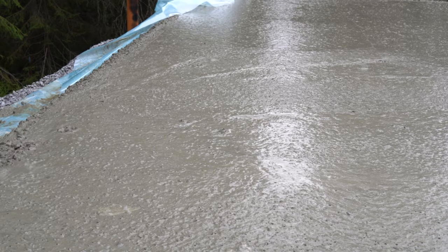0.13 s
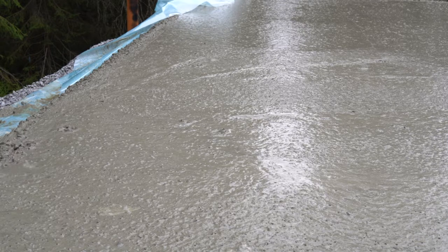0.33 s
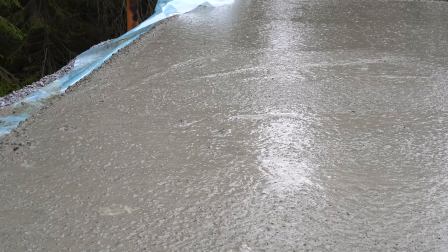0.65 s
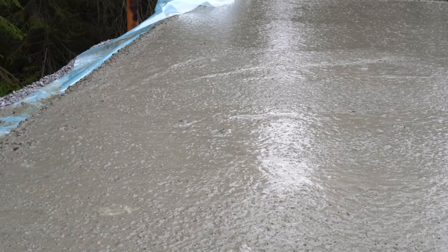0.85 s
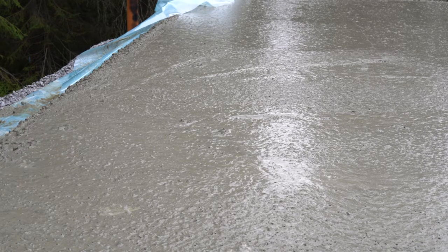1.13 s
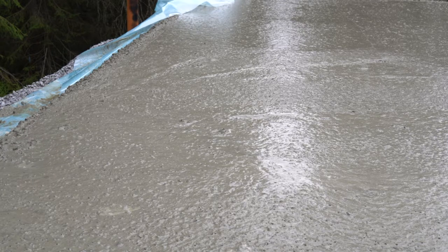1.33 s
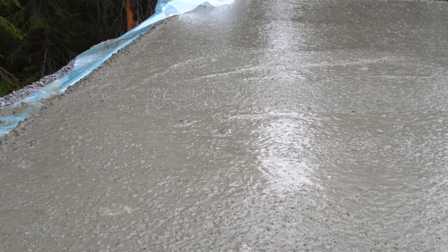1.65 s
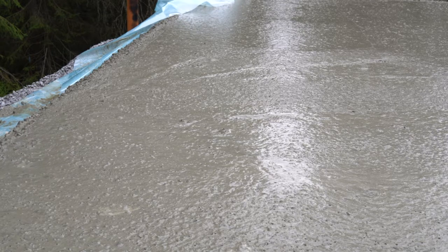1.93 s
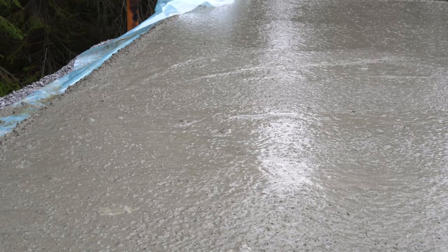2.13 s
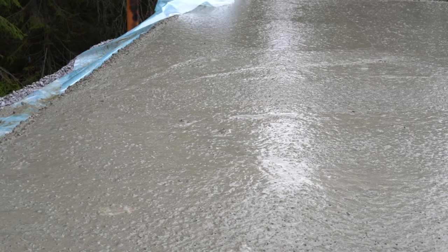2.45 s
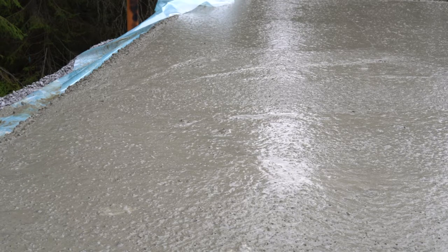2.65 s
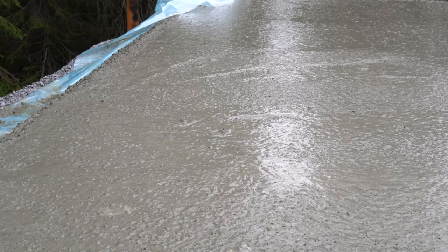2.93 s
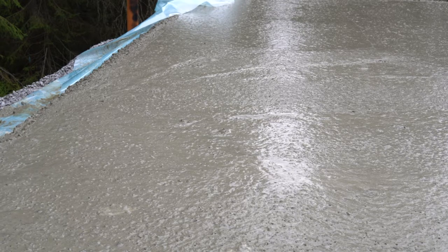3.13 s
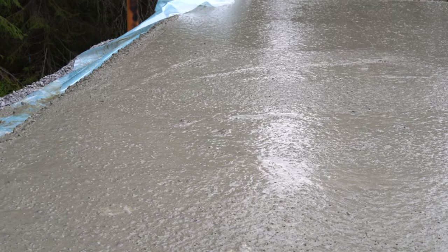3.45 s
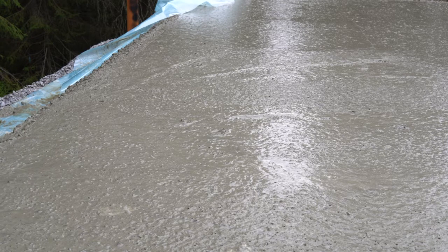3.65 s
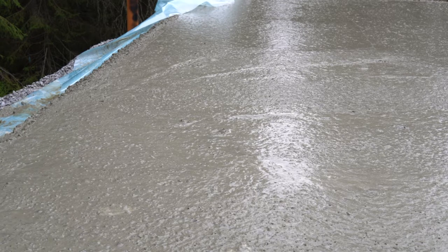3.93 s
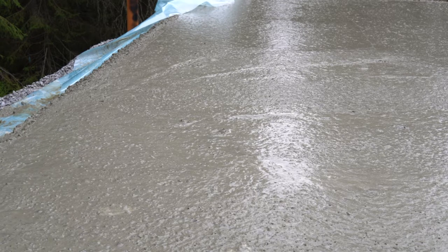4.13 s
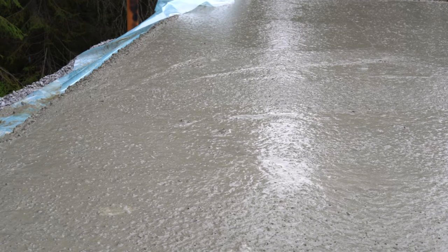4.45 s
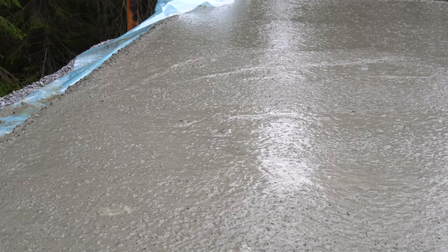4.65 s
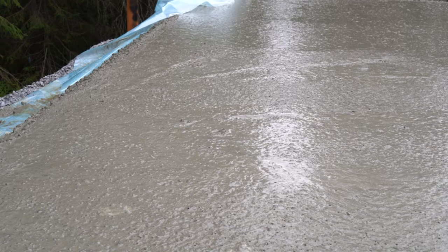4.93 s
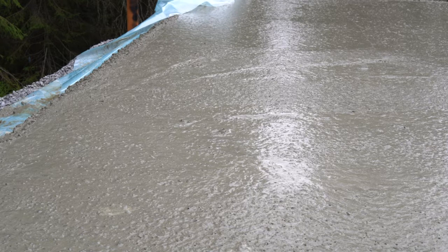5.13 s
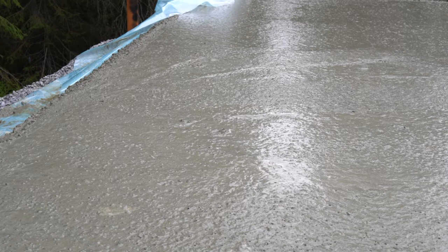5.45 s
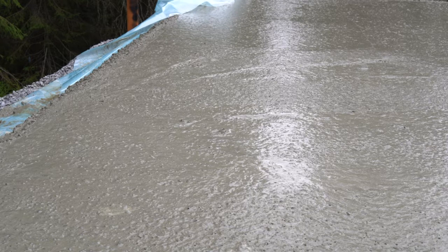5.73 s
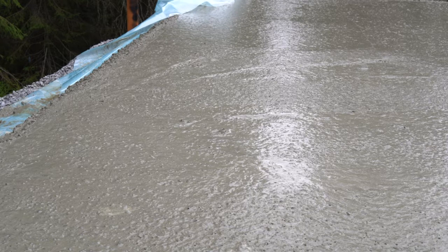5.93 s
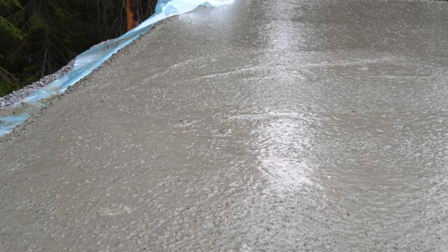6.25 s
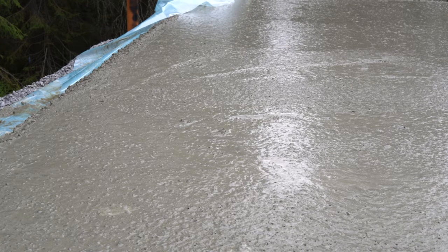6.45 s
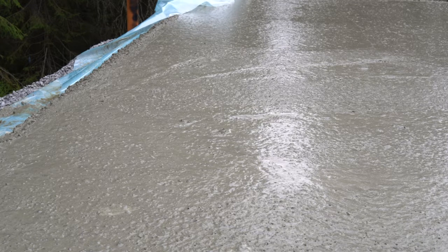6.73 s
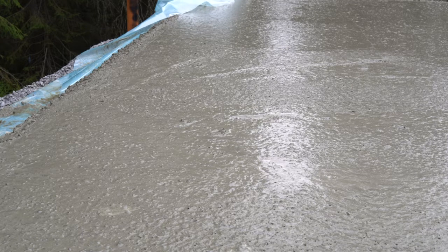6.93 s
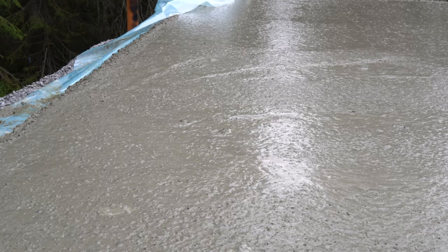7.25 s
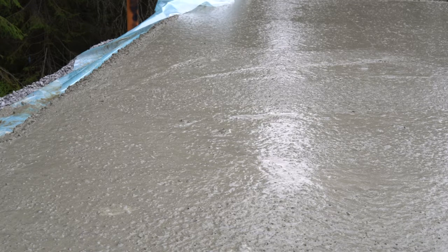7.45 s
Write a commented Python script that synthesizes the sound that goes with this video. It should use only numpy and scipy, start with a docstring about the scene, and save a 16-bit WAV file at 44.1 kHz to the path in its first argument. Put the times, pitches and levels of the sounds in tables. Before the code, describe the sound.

A concrete vibrator hums and whirs loudly in wet concrete, is switched off, winds down with scraping and ringing, then handling knocks and faint clicks.

```python
"""A poker vibrator hums in a slab of wet concrete: an eccentric weight forces the slab once a turn.
Its electric drive whirs close by on the left, as tones and noise bands tied to the shaft speed.
The shaft sags under load, is switched off and coasts down, brushes scraping and housing ringing.
The tool is shifted in the hand: rustles, one sharp clack and a few faint clicks, as shaped noise."""
import sys
import numpy as np
from scipy import signal
from scipy.fft import rfft, irfft
from scipy.io import wavfile

SR = 44100
rng = np.random.default_rng(int(sys.argv[2]) if len(sys.argv) > 2 else 0)


def bounce(signal):
    """Save signal as a 16-bit WAV file at the path given by the first command-line argument."""
    frames = np.transpose(np.atleast_2d(signal))
    limited = np.clip(frames, -1, 1)
    pcm = np.round(limited * 32767).astype(np.int16)
    wavfile.write(sys.argv[1], SR, pcm)


N = 334719
T = np.arange(N) / SR
HZ = np.fft.rfftfreq(N, 1 / SR)

OFF_S = 3.52  # the motor is switched off
# coasting: the fan's drag soon takes its part of the speed, friction takes the rest evenly
DRAG_HZ, DRAG_S, FRICTION_HZ_PER_S = 102.9, 0.47, 45
# shaft speed when fully loaded by the concrete, and when running almost free
LOADED_HZ, FREE_HZ = 265.6, 280.3
# the scrape's centre sinks with the shaft: pitch at rest, and Hz per Hz of shaft speed
SCRAPE_REST_HZ, SCRAPE_ORDER = 3020, 7.84
RING_STOP_HZ = 70  # below this shaft speed the housing's ring dies out steeply
RASP_DB = -67  # steady part of the bearing's rasp until the switch-off
EDGE_HZ = 15900  # upper edge of the whole sound

# shaft speed: it sags as the head sinks in, and picks up as the load eases: start_s, speed_hz
SPEED = [(.21, 312.3), (.6, 276.7), (.8, 268), (1.05, 267.1), (1.5, 259.6), (2.03, 270.6), (2.42, 267.6),
         (3, 271.7), (3.52, 283)]
# how well the head shakes the slab under power: start_s, first_order_db, second_order_db, third_order_db
SHAKE = [(.07, -37.5, -52, -64), (.125, -47, -54, -46), (.18, -32.5, -36, -43.5), (.41, -22, -33, -38.5),
         (.76, -24.5, -48.5, -44.5), (.92, -24.5, -38.5, -37.5), (1.32, -27.5, -43.5, -47.5),
         (1.45, -24, -57, -46.5), (1.66, -25.5, -39, -41), (1.98, -26, -42, -49.5), (2.16, -22, -42, -58),
         (2.23, -25, -46, -50), (2.35, -20, -37.5, -63), (2.45, -21.5, -47, -51), (2.56, -19, -41, -43),
         (2.76, -22, -45, -43), (3, -21.5, -35, -34), (3.15, -23, -41, -44.5), (3.28, -22.5, -44, -38.5),
         (3.52, -24.5, -41, -46)]
# weakening of the head's first three orders as it slows: fall_db_per_octave for each
POKER_FALL_DB = [26.5, 23.5, 25]
# weaker orders of the head, against the third: shaft_multiple, level_db
OVERTONES = [(4, -14.5), (5, -12.5), (6, -18.5)]
# narrow band that the slab hardly radiates: centre_hz, half_width_hz (to 1/e of the depth), depth_db
DEAD_BAND = (173, 18.5, 8.7)
# mains hum: pitch_hz, level_db
HUM = [(101, -66.5), (202, -52)]

# noise spectra of gravel, fan rush and brush fizz (only the shape counts): pitch_hz, density_db_per_hz
CHURN = [(25, -33.5), (60, -29.5), (100, -12.5), (150, -14), (230, 3), (400, -0.5), (650, -3.5),
         (1000, -8.5), (2000, -5.5), (5000, -42)]
AIR = [(150, -34.5), (400, -6), (950, -11.5), (1400, -16.5), (2100, -7.5), (3300, -5.5), (4300, -11),
       (6300, -13), (9000, -20), (11000, -27)]
FIZZ = [(2500, -29.5), (5000, 2.5), (6500, 2.5), (9200, 2.5), (10500, -2), (12500, -4.5), (14300, -1.5),
        (16000, -10.5)]
# resonances of the motor casing in the fan's rush: pitch_hz, half_width_hz, relative_db
CASING = [(1237, 27, 0.5), (1656, 220, 1), (2435, 190, 0), (2918, 81, -3), (4830, 320, -24),
          (5950, 250, -14.5)]
# layers that follow the shaft: loaded_level_db, free_running_gain_db, fall_db_per_octave of slowing
CHURN_LEVEL = (-44.5, 1, 19.8)
AIR_LEVEL = (-44, 3.3, 13.6)
FIZZ_LEVEL = (-57.5, 8.1, 9)
BUZZ_LEVEL = (-56.5, 8.9, 16)

# buzz of the armature and whine of the commutator: shaft_multiple, relative_db
BUZZ = [(7, -1.5), (9, -6.5), (10, -1), (11, 2), (12, -3), (14, -0.5), (15, -5.5), (16, -13), (17, -2),
        (18, -3.5)]
WHINE = [(25, -25), (26, -3), (27, 1.5), (28, 2.5), (29, -15.5), (30, -4.5), (31, -7), (32, -18.5),
         (33, -10)]
# the commutator sings out in spells: full_from_s, fall_from_s, level_db, rise_db_per_s, fall_db_per_s
SINGING = [(0.05, 0.449, -51, 10, 9), (2.76, 3.5, -51.5, 60, 22)]
# the brushes' hissing bands under power: shaft_multiple, width_hz, level_db
BRUSH = [(28.66, 420, -62), (34.65, 330, -66.5)]
# the bearing's rasp builds: full_from_s, fall_from_s, level_db, rise_db_per_s, fall_db_per_s
RASP_SWELL = (3.5, 3.5, -51, 21.5, 32)

# partials as the loose weight whirls in coasting: shaft_multiple, level_db
WHIRL = [(1.5, -58.5), (2.3, -59.5), (2.62, -66)]
# ragged strands of the unpowered commutator: shaft_multiple, width_hz, relative_db
STRANDS = [(23.56, 100, -3.5), (25, 100, 2), (27.2, 39, 1.5), (30.06, 350, 2.5), (33.18, 560, -6.5),
           (36.2, 390, -10)]
# modes of the housing, and of the bearing before its low cut: pitch_hz, half_width_hz, relative_db
HOUSING = [(5400, 350, 9.5), (7600, 290, 2), (9040, 45, -18.5), (8940, 69, 5), (9550, 140, 4),
           (10250, 58, 5), (11420, 160, 5), (12800, 170, -2.5), (13950, 140, 3.5), (15400, 170, -12)]
BEARING = [(463, 81, 0.5), (1317, 120, 2), (1970, 200, -6), (2380, 150, -3.5), (3020, 190, -2)]
# spectra of the coasting brushes' fine sizzle and of the low rumble: pitch_hz, density_db_per_hz
SIZZLE = [(4000, -21), (6800, -13), (9300, 2.5), (11000, -4), (14300, -2.5), (16000, -6.5)]
RUMBLE = [(20, -19), (45, -9.5), (80, 5.5), (130, -10), (300, -29.5), (800, -60.5)]
# swells of the coasting sounds; where the fall starts before the rise ends, both slopes act at once:
# full_from_s, fall_from_s, level_db, rise_db_per_s, fall_db_per_s
STRANDS_SWELL = (4, 4.5, -46, 26.5, 61)
RING_SWELL = (6.5, 5.5, -56, 0.5, 27.5)
RUMBLE_SWELL = (4, 4.5, -72.5, 35, 60)
SIZZLE_SWELL = (5, 5.5, -58.5, 21, 70)
# the brushes bite in waves, and the bearing rubs: same columns
SCRAPES = [(4.2, 4.506, -43.5, 27, 23), (5.149, 5.185, -45, 35, 34), (6.1, 6.144, -58, 19, 59.5)]
RUBS = [(4.86, 5.198, -57, 20.5, 26), (6.12, 6.16, -60.5, 49, 19.5)]

# shifts of the tool in the hand, and the low bump of the first: same columns
RUSTLES = [(5.105, 5.125, -52, 250, 170), (5.258, 5.31, -54, 34.5, 44), (5.96, 6, -56.5, 198, 198),
           (6.64, 6.642, -58.5, 163, 190), (6.802, 6.85, -67, 33, 170), (7.345, 7.383, -55, 250, 160),
           (7.495, 7.537, -61.5, 121.5, 240)]
BUMP = (5.125, 5, -63, 325, 200)
# spectra of the rustles, the knocks and the steady background: pitch_hz, density_db_per_hz
RUSTLE = [(35, -51.5), (100, -23.5), (217, -13.5), (390, -3), (666, -7), (1010, -13), (1410, -16),
          (2580, -14.5), (3760, -21.5), (9350, -26), (13000, -24.5), (16000, -39)]
KNOCK = [(35, -52.5), (60, -13), (287, -9), (448, 4), (785, -9.5), (1250, 1), (1860, -1.5), (2050, -5.5),
         (3190, -8.5), (4420, -15.5), (5720, -16), (6740, -25.5), (8320, -20), (11800, -23), (16000, -38)]
FLOOR = [(25, -5.5), (100, -9), (400, -8.5), (1400, -3), (2500, -8.5), (4000, -19.5), (16000, -16.5)]
# knocks and clicks of the tool: start_s, level_db, decay_t60_s, brightness_db_per_octave
KNOCKS = [(5.092, -35, 0.0081, 6), (5.108, -38, .03, 1), (5.384, -40.5, 0.025, -4.5),
          (5.759, -49, 0.035, -7), (5.995, -57, 0.034, -3), (6.555, -51.5, 0.091, 7),
          (6.578, -42.5, 0.047, 8), (6.590, -29, 0.073, 2), (6.5954, -28, 0.045, 2.5),
          (6.657, -48, .015, 6.5), (6.798, -53, 0.011, 2), (7.193, -67.5, .03, 2), (7.265, -64, 0.056, 3),
          (7.369, -42.5, 0.021, 5), (7.477, -49, 0.017, -2), (7.538, -51.5, 0.026, 3)]
# stereo image of the drive and of the slab: pitch_hz, left_minus_right_db, channel_likeness (0 to 1)
NEAR = [(97.3, -4.5, 0.88), (500, 7, 1), (1375, 22, 1), (2800, 12.5, 0.51), (5500, 12, 0.33),
        (9920, 10, 0.39), (14530, 7, 0.55)]
SLAB = [(100, 0.32, 1), (270, 1.46, 1), (700, 3.5, 0.97), (2000, 6, 1)]


def amp(db):
    """Level law: decibels to an amplitude ratio."""
    return 10 ** (np.asarray(db) / 20)


def unit(x):
    """Normalisation to an rms of 1."""
    return x / np.sqrt(np.mean(x ** 2) + 1e-20)


def curves(rows):
    """Linear interpolation of a table's columns over time."""
    s, *columns = np.transpose(rows)
    return [np.interp(T, s, column) for column in columns]


def spectra(rows):
    """Linear interpolation of a table's columns over log frequency."""
    hz, *columns = np.transpose(rows)
    return [np.interp(np.log(HZ + 1), np.log(hz), column) for column in columns]


def colour(rows):
    """Spectral shaping: gain over frequency of a short spectrum."""
    return amp(spectra(rows)[0])


def modes(rows):
    """Superposition of resonances, each with its gain halved at the half-width."""
    return sum(amp(db) / (1 + ((HZ - hz) / half_width) ** 2) for hz, half_width, db in rows)


def drift(rate_hz):
    """Slow random modulation: noise low-passed at 0.8 of rate_hz, with an rms of 1."""
    s = np.arange(0, T[-1] + 1, 1 / (8 * rate_hz))
    lowpass = signal.butter(2, 1 / 5, output="sos")
    wander = signal.sosfilt(lowpass, rng.standard_normal(len(s)))
    return unit(np.interp(T + 1 / 2, s, wander))  # skips the filter's first half second


def fade(s, db_per_s):
    """Exponential decay that sets in at s."""
    return amp(-db_per_s * np.maximum(T - s, 0))


def swell(start_s, end_s, db, rise_db_per_s, fall_db_per_s):
    """Exponential growth until start_s and exponential decay from end_s."""
    return amp(db - rise_db_per_s * np.maximum(start_s - T, 0)) * fade(end_s, fall_db_per_s)


def swells(rows):
    """Power addition of several swells."""
    return np.linalg.norm([swell(*row) for row in rows], axis=0)


def hiss():
    """Two statistically independent white noises."""
    return rng.standard_normal((2, N))


def filtered(x, gain):
    """Minimum-phase filtering by the folded cepstrum; white noise keeps its power."""
    gain = np.maximum(unit(gain), 1e-5)
    size = 8192
    log_gain = np.log(np.interp(np.fft.rfftfreq(size, 1 / SR), HZ, gain))
    cepstrum = irfft(log_gain)
    cepstrum[1:] *= 2 * (np.arange(1, size) < size / 2)
    impulse = irfft(np.exp(rfft(cepstrum)))[None, :size // 2]
    return signal.oaconvolve(x, impulse, axes=1)[:, :x.shape[1]]


def resonate(x, hz, width_hz):
    """Heterodyne resonance: a double pole in the frame turning at the curve hz."""
    turn = np.exp(2j * np.pi * np.cumsum(hz) / SR)
    r = np.exp(-np.pi * width_hz / SR)
    return (turn * signal.lfilter([(1 - r) ** 2], [1, -2 * r, r * r], x / turn)).real


def place(pair, side, lag_s):
    """Stereo by level, coherence and delay: the balance varies with frequency and the right lags."""
    balance_db, same = spectra(side)
    same, ratio = np.clip(same, 0, 1), amp(-balance_db)
    a, b = rfft(pair)
    mixed = same * a + np.sqrt(1 - same ** 2) * b
    right = ratio * mixed * np.exp(-2j * np.pi * HZ * lag_s)
    return irfft(np.array([a, right]) * 2 / (1 + ratio), N)


def shaft():
    """Rotational run-down: the load sets the speed in Hz, then drag and friction lower it to 10 Hz."""
    coast_s = np.maximum(T - OFF_S, 0)
    dragged_hz = DRAG_HZ * (1 - np.exp(-coast_s / DRAG_S))
    speed_hz = curves(SPEED)[0] - dragged_hz - FRICTION_HZ_PER_S * coast_s
    return np.maximum(speed_hz, 10) * (1 + 0.0006 * drift(12))


def slowed(speed_hz):
    """Logarithmic slowing: octaves below the speed under power."""
    return np.log2(curves(SPEED)[0] / speed_hz)


def driven(speed_hz, loaded_db, free_db, fall_db):
    """Power law of speed: a layer grows as the load eases and falls as the shaft coasts."""
    ease = np.clip((curves(SPEED)[0] - LOADED_HZ) / (FREE_HZ - LOADED_HZ), 0, 1)
    return amp(loaded_db + free_db * ease - fall_db * slowed(speed_hz))


def racing(speed_hz):
    """Unloading: from 0 to 1 as the barely immersed head lets the shaft race."""
    return np.clip((speed_hz - 285) / 25, 0, 1)


def radiated(hz):
    """Radiation notch: gain of a tone as it slides through the slab's dead band."""
    centre_hz, half_width_hz, depth_db = DEAD_BAND
    return amp(-depth_db * np.exp(-((hz - centre_hz) / half_width_hz) ** 2))


def throb(angle, depth):
    """Subharmonic modulation: a bearing throbs about once every four and a half turns."""
    return unit(np.exp(depth * np.cos(0.225 * angle + 0.32 * drift(4.5))))


def orders(angle, rows, jitter):
    """Order synthesis: wavering tones on multiples of the shaft speed, drawn for each channel."""
    def tone(k, db):
        phase = k * angle + jitter * drift(22) + rng.uniform(0, 2 * np.pi)
        return amp(db + 1.5 * drift(11)) * np.sin(phase)
    return unit(np.array([sum(tone(k, db) for k, db in rows) for _ in range(2)]))


def poker(angle, speed_hz):
    """Forced vibration by an eccentric weight; shifting stones make the overtones waver."""
    slowing = slowed(speed_hz)
    first, second, third = [db - fall_db * slowing for db, fall_db in zip(curves(SHAKE), POKER_FALL_DB)]
    harsh_db = 8 * racing(speed_hz)
    tone = amp(first + 0.47 * drift(11)) * radiated(speed_hz) * np.sin(angle)
    overtones = [(2, second), (3, third)]
    overtones += [(k, third + db + harsh_db) for k, db in OVERTONES]
    for k, db in overtones:
        phase = k * (angle + 0.089 * drift(17)) + rng.uniform(0, 2 * np.pi)
        tone += amp(db + 2.16 * drift(18)) * radiated(k * speed_hz) * np.sin(phase)
    return np.array([np.sqrt(2) * tone * fade(5.8, 84.5), np.zeros(N)])


def hum():
    """Mains-frequency excitation: the hum swells as the motor takes up the load."""
    tones = sum(amp(db + 0.9 * drift(5.1)) * np.sin(2 * np.pi * hz * T + 0.32 * drift(3.9))
                for hz, db in HUM)
    load = amp(-35 * np.maximum(0.7 - T, 0)) * fade(OFF_S, 25.4)
    return np.array([np.sqrt(2) * tones * load, np.zeros(N)])


def churn(angle, speed_hz):
    """Amplitude-modulated noise: wet gravel jostles against the poker on each swing."""
    jostle = unit(1 + 0.5 * np.cos(angle)) * amp(0.67 * drift(25))
    level = driven(speed_hz, *CHURN_LEVEL) * amp(-3 * racing(speed_hz))
    return filtered(hiss() * jostle, colour(CHURN)) * level


def air(angle, speed_hz):
    """Chopped flow noise: the fan's rush through the casing, and the finer fizz of the brushes."""
    # mainly twice a turn, less once a turn
    chop = unit((1 + 0.22 * np.cos(2 * angle) + 0.12 * np.cos(angle)) * amp(0.89 * drift(120)))
    rush = filtered(hiss() * chop, np.hypot(colour(AIR), modes(CASING))) * driven(speed_hz, *AIR_LEVEL)
    fizz = filtered(hiss() * chop, colour(FIZZ)) * driven(speed_hz, *FIZZ_LEVEL) * fade(5, 35)
    return (rush + fizz) * amp(2 * racing(speed_hz)) * fade(5.85, 45)


def whine(angle, speed_hz):
    """Slot-passing tones: armature slots buzz, commutator bars sing with sidebands one turn apart."""
    buzz = orders(angle, BUZZ, jitter=0.9) * throb(angle, depth=0.34)
    buzz *= driven(speed_hz, *BUZZ_LEVEL) * amp(-3 * racing(speed_hz))
    singing = swells(SINGING) * amp(2 * drift(5)) * fade(4, 40)
    bars = orders(angle, WHINE, jitter=1.1) * singing * throb(angle, depth=0.5)
    # the brushes hiss along in bands
    brushes = sum(amp(db + 2.5 * drift(5)) * unit(resonate(hiss(), k * speed_hz, width))
                  for k, width, db in BRUSH)
    brushes *= (speed_hz / 268) ** 4 * fade(OFF_S, 15)
    # as the load eases the bearing's pulsing rasp grows
    rasp = unit(resonate(hiss() * throb(angle, depth=1.3), 16.5 * speed_hz, 550))
    rasp *= np.hypot(amp(RASP_DB) * fade(OFF_S, 40), swell(*RASP_SWELL))
    return buzz + bars + rasp + brushes


def whirl(angle):
    """Non-synchronous whirl: without drive, faint unsteady partials lie between the shaft orders."""
    tones = sum(amp(db + 4.1 * drift(12)) * np.sin(k * angle + drift(9.2)) for k, db in WHIRL)
    unpowered = np.clip((T - OFF_S) / 0.16, 0, 1)
    return np.array([np.sqrt(2) * tones * unpowered * fade(4.16, 25), np.zeros(N)])


def coasting(angle, speed_hz):
    """Periodic friction excitation: uneven brush catches, two a turn, scrape, ring and rattle."""
    beats = angle / np.pi
    strength = amp(5.8 * np.clip(rng.standard_normal(N), -2, 1.5))[beats.astype(int)]
    catches = unit(1.1 + strength * np.cos(np.pi * beats) ** 4)
    surges = catches * throb(angle, depth=0.45)
    strands = sum(amp(db) * unit(resonate(hiss() * surges, k * speed_hz, width))
                  for k, width, db in STRANDS)
    strands = unit(strands) * swell(*STRANDS_SWELL)

    scrape_hz = SCRAPE_REST_HZ + SCRAPE_ORDER * speed_hz
    scrape = unit(resonate(hiss() * catches * throb(angle, depth=0.2), scrape_hz, 750))
    scrape *= swells(SCRAPES)

    # each housing mode flares and fades on its own
    ring = sum(amp(db + 2.3 * drift(7.1)) * unit(resonate(hiss() * catches, np.full(N, hz), 2 * half_width))
               for hz, half_width, db in HOUSING)
    ring = unit(ring) * swell(*RING_SWELL) * np.clip(speed_hz / RING_STOP_HZ, 0, 1) ** 5
    sizzle = filtered(hiss() * catches, colour(SIZZLE)) * swell(*SIZZLE_SWELL)

    # the bearing loses its upper resonances as the shaft slows below 55 Hz
    bright = np.clip(speed_hz / 55, 0, 1) ** 2
    low_cut = HZ ** 2 / (HZ ** 2 + 300 ** 2)
    rub = filtered(hiss() * catches, modes(BEARING) * low_cut)
    dull = signal.lfilter(*signal.butter(2, 1900, fs=SR), rub)
    rub = (bright * rub + (1 - bright) * dull) * swells(RUBS)
    unpowered = np.clip((T - OFF_S) / 0.11, 0, 1)
    return unpowered * (strands + scrape + ring + sizzle + rub)


def low_rumble():
    """Low-frequency noise: a rumble while coasting, and the bump of the first shift in the hand."""
    return filtered(hiss(), colour(RUMBLE)) * (swell(*RUMBLE_SWELL) + swell(*BUMP))


def handling():
    """Contact noise: grainy rustles, and short decaying knocks with a faint, darker diffuse tail."""
    grain = amp(3 * drift(170))
    rustle = filtered(hiss() * swells(RUSTLES) * grain, colour(RUSTLE))
    knocks, body, age = np.zeros((2, N)), colour(KNOCK), T[:SR // 2]
    octaves = np.log2(np.maximum(HZ, 300) / 1000)
    for s, db, t60, tilt_db in KNOCKS:
        burst = rng.standard_normal((2, len(age))) * amp(db - 60 * age / t60)
        part = knocks[:, round(s * SR):][:, :len(age)]
        part += filtered(burst, body * amp(tilt_db * octaves))[:, :part.shape[1]]
    dark_noise = signal.lfilter(*signal.butter(1, 3000, fs=SR), rng.standard_normal((2, len(age))))
    tail = dark_noise * amp(-60 * age / 0.8)
    tail /= np.linalg.norm(tail[0])
    return rustle + knocks + amp(-26) * signal.oaconvolve(knocks, tail, axes=1)[:, :N]


def background():
    """Stationary noise: a faint, steady, coloured hiss."""
    return amp(-88.5) * filtered(hiss(), colour(FLOOR))


def scene():
    """Superposition: one shaft angle drives the poker in the slab and the motor noises on the left."""
    speed_hz = shaft()
    angle = 2 * np.pi * np.cumsum(speed_hz) / SR
    concrete = poker(angle, speed_hz) + hum() + churn(angle, speed_hz) + whirl(angle) + low_rumble()
    slab = place(concrete, SLAB, lag_s=6e-5)
    motor = place(air(angle, speed_hz) + whine(angle, speed_hz), NEAR, lag_s=7e-5)
    rattles = place(coasting(angle, speed_hz) + handling(), NEAR, lag_s=1.3e-4)
    return slab + motor + rattles + background()


def record(dry):
    """Band limitation: a steep linear-phase low-pass at the upper edge."""
    lowpass = signal.firwin(511, EDGE_HZ, window=("kaiser", 9), fs=SR)
    return signal.oaconvolve(dry, lowpass[None], "same")


dry = scene()
out = record(dry)
bounce(out)
```